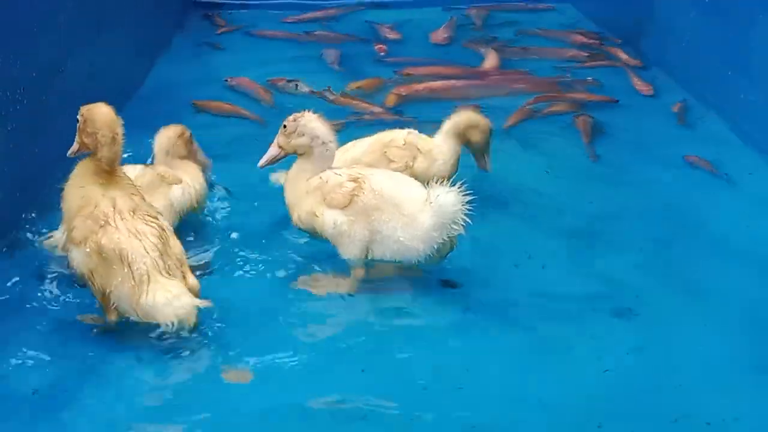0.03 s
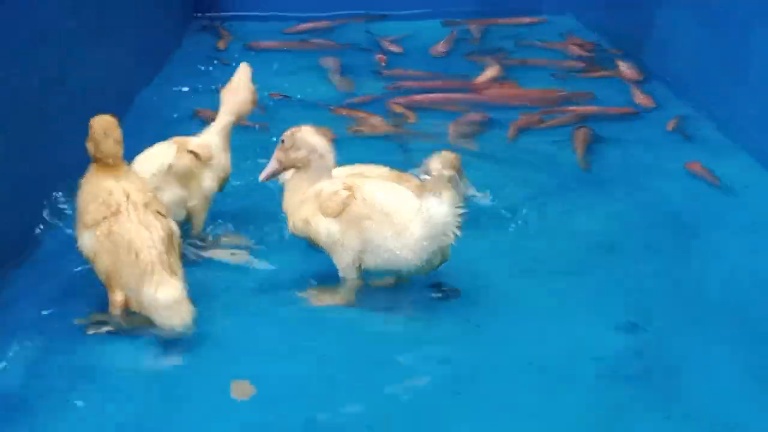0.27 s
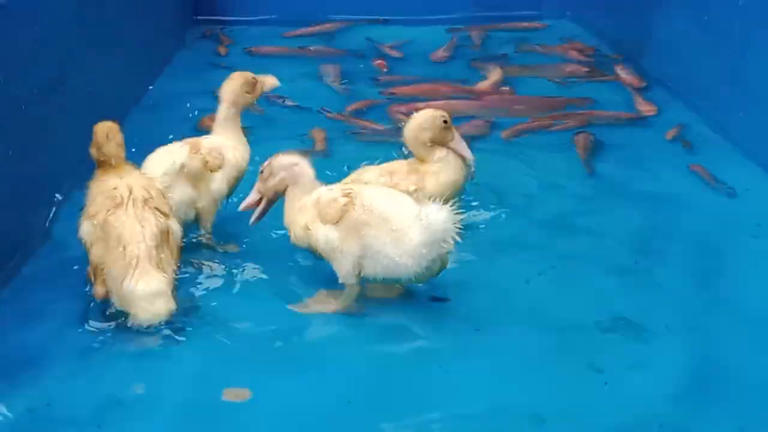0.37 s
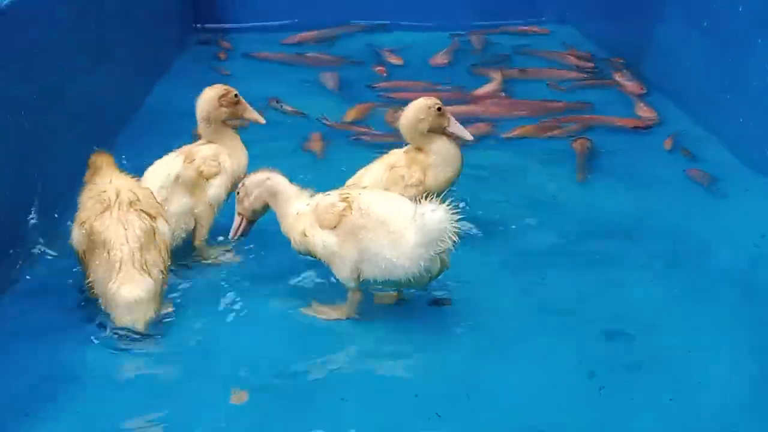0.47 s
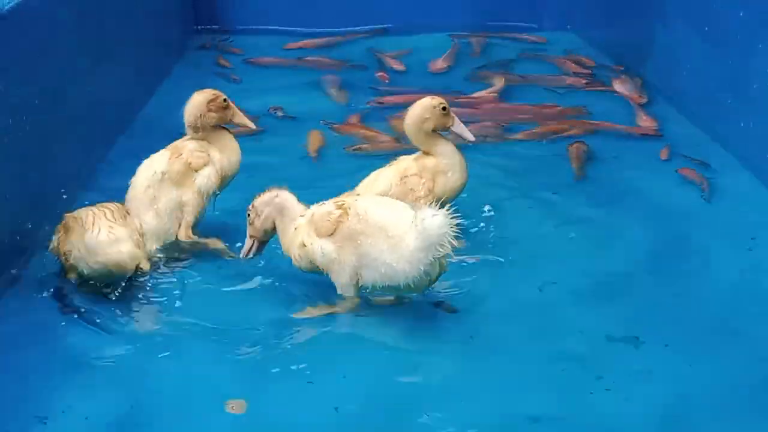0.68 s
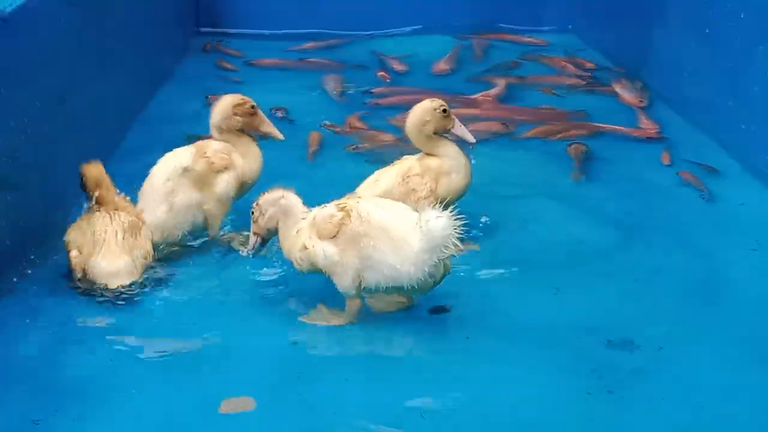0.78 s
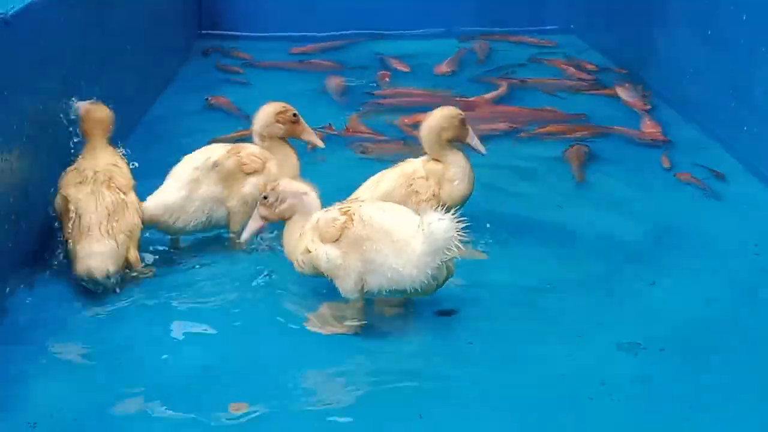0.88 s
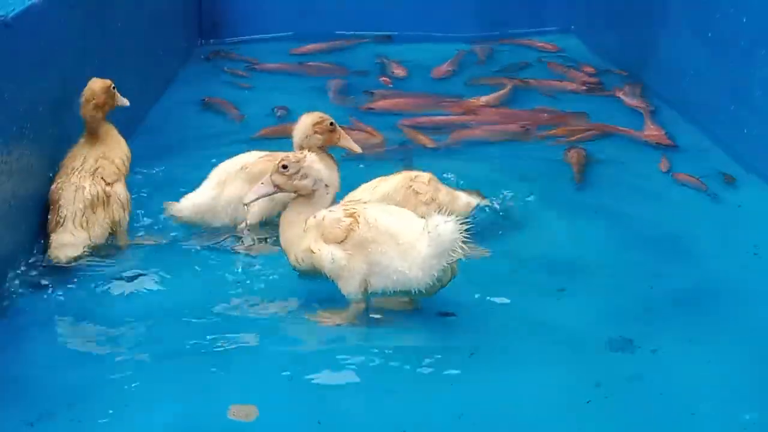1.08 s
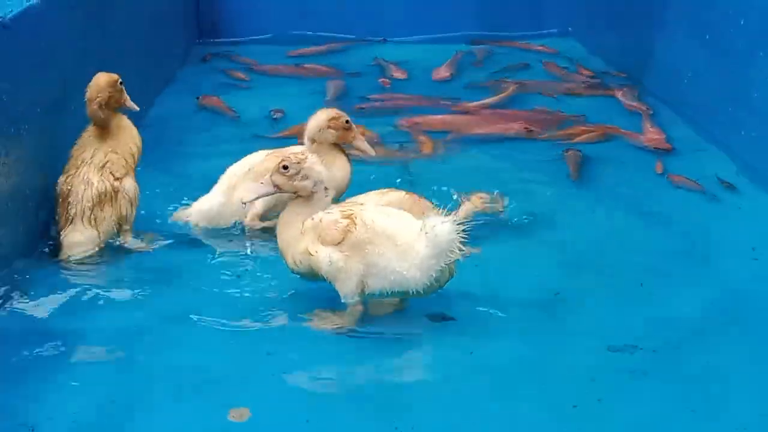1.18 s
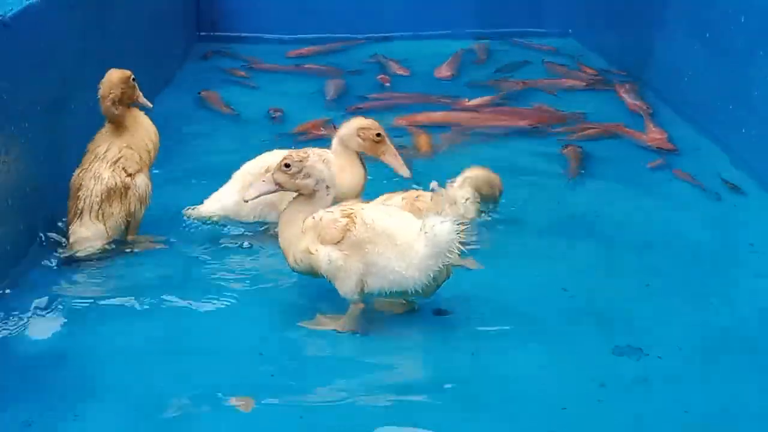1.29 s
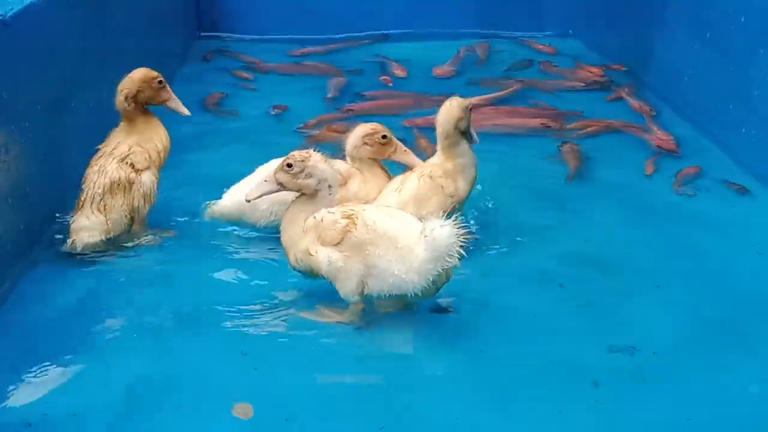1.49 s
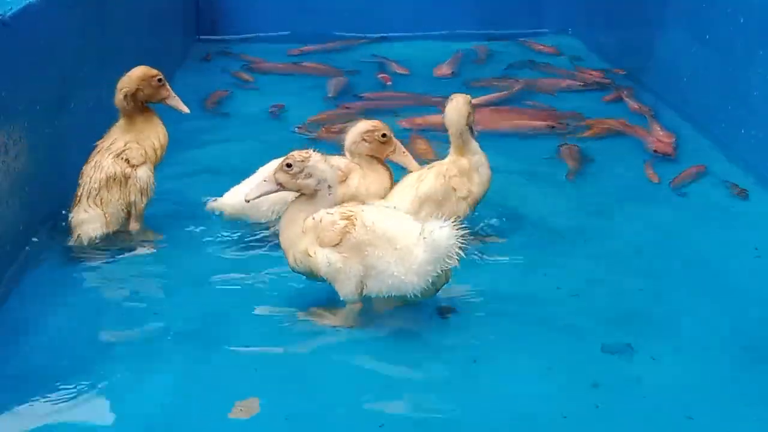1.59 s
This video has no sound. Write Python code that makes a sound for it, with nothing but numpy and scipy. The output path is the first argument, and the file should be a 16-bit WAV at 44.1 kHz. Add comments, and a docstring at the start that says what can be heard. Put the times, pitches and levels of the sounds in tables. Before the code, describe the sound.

Ducklings peep a few times, then splash and plop in shallow water.

```python
"""Ducklings in a shallow pool

Ducklings paddle outdoors and peep in near-pure arching whistles. Bills and feet throw up splashes,
swarms of tiny resonating bubbles; single drops plink, and one dive closes with a low, rising gulp.
The hard pool walls reflect it all quickly, over faint wavering tones, a low rumble and a high hiss
that dies away near the end."""
import sys
import numpy as np
from scipy import signal
from scipy.fft import rfft, irfft, next_fast_len
from scipy.io import wavfile
from scipy.ndimage import uniform_filter1d

SR = 44100
rng = np.random.default_rng(int(sys.argv[2]) if len(sys.argv) > 2 else 0)


def master_out(mix):
    """Clip the mix to full scale and print it as 16-bit PCM to the path in sys.argv[1]."""
    frames = np.transpose(np.atleast_2d(mix))
    ceiling = np.clip(frames, -1, 1)
    pcm = np.round(ceiling * 32767).astype(np.int16)
    wavfile.write(sys.argv[1], SR, pcm)


N = 72765


def ducklings():
    """Pitch glides: loud arching peeps, their distance heard as echo level, and soft falling ones."""
    # close peeps, one contour each: t/s, f/Hz, level/dB
    peeps = [
        [(.170, 1495, -50.5), (.180, 2220, -54), (.190, 2660, -57.5), (.197, 2694, -42), (.213, 2764, -32.5),
         (.226, 2433, -35.5), (.240, 2277, -31), (.254, 2235, -31), (.264, 2068, -35.5), (.272, 1714, -44)],
        [(.450, 1577, -50.5), (.459, 2185, -38.5), (.468, 2636, -34.5), (.476, 3108, -50), (.485, 3413, -37.5),
         (.500, 3178, -41), (.507, 2705, -25.5), (.520, 2535, -28.5), (.527, 2552, -20), (.545, 2296, -27),
         (.557, 1850, -41.5)],
        [(.590, 4500, -48.5), (.602, 3925, -43), (.609, 3268, -35), (.620, 3085, -33), (.632, 2800, -37),
         (.644, 2390, -48.5)],
    ]
    # echo of each close peep: level/dB
    echo_levels = [5, 1, 4.5]
    # soft peeps: t/s, length/s, first f/Hz, last f/Hz, level/dB
    soft_peeps = [(0.087, 0.062, 4700, 3470, -62.5), (0.211, 0.037, 4023, 3048, -42),
                  (0.234, .05, 3498, 2988, -37), (0.25, 0.029, 4520, 3260, -43),
                  (0.357, 0.037, 4394, 3265, -54), (0.532, .018, 4920, 3850, -54),
                  (0.673, 0.015, 4870, 2905, -48.5), (0.792, 0.025, 4890, 2550, -54),
                  (1.216, 0.016, 3825, 2650, -52), (1.405, 0.05, 4140, 3770, -69.5),
                  (1.439, 0.028, 4030, 2744, -58), (1.586, 0.043, 4185, 2930, -63),
                  (1.600, .03, 4540, 3580, -77)]
    loud, soft = np.zeros((2, N))
    for rows, wet_db in zip(peeps, echo_levels):
        loud += pool(whistle(curve(rows), swell(rows), waver=.009, octave_db=-39), wet_db)
    for start, length, first_hz, last_hz, db in soft_peeps:
        progress = np.clip((np.arange(N) / SR - start) / length, 0, 1)
        hz = first_hz + (last_hz - first_hz) * progress * (1 + progress) / 2
        gain = np.sqrt(2) * undb(db) * np.sin(np.pi * progress)
        soft += whistle(hz, gain, waver=.013, octave_db=-33)
    return loud + pool(soft, wet_db=0.5)


def whistle(hz, gain, waver, octave_db):
    """A duckling's voice: a sine and weak second harmonic, modulated in frequency and amplitude."""
    phase = wavering_phase(hz, waver, rate_hz=540)
    flutter_db = 2.2 * walk(250)
    return gain * undb(flutter_db) * (np.sin(phase) + undb(octave_db) * np.sin(2 * phase))


def gulp():
    """Cavity resonance: the pitch of an air pocket rises as it closes."""
    # air pocket resonance: t/s, f/Hz, level/dB
    pocket = [(.960, 170.9, -55.5), (.990, 164.8, -37.5), (1.015, 186.5, -32), (1.035, 241.8, -39),
              (1.050, 325.3, -30), (1.064, 416, -42), (1.080, 465, -33.5), (1.094, 612, -41),
              (1.125, 500, -77.5)]
    return swell(pocket) * np.sin(wavering_phase(curve(pocket), waver=.03, rate_hz=150))


def plinks():
    """Free oscillation: each single bubble rings at its natural frequency."""
    # bubbles: t/s, f/Hz, level/dB, T60/s, rise/(octaves/s)
    bubbles = [(.023, 2246, -35.5, 0.012, -13), (0.077, 1582, -54, 0.081, 1.5),
               (0.105, 2580, -42.5, 0.021, -14.5), (0.152, 2280, -49.5, 0.05, -11.5),
               (.158, 1523, -49, 0.3, 4.5), (0.263, 1444, -38.5, 0.049, 1), (0.282, 884, -41.5, 0.083, -2),
               (0.398, 1775, -46.5, 0.12, 1), (0.571, 1687, -40, 0.032, 2.5),
               (.642, 1910, -44.5, 0.026, 4.5), (0.747, 803, -48.5, 0.12, 12.5),
               (0.755, 1326, -40, 0.032, -13), (0.83, 1418, -38.5, 0.065, 0.5),
               (0.839, 1450, -35.5, 0.027, 10.5), (0.907, 898, -42, 0.3, -4),
               (.927, 813, -22.5, 0.03, 12.5), (0.943, 1530, -24.5, 0.01, 4), (0.969, 932, -28, 0.12, 7),
               (1.0469, 1617, -23.5, 0.075, 20.5), (1.079, 58.7, -34.5, 0.031, 5.5),
               (1.083, 501, -15, 0.012, 25), (1.181, 802, -30, 0.049, 3), (1.182, 966, -33.5, 0.098, 8),
               (1.310, 536, -44, 0.047, -8.5), (1.432, 2038, -67, 0.15, 2)]
    out = np.zeros(N)
    for start, hz, db, t60, rise in bubbles:
        add(out, start, undb(db) * bubble(hz, t60, rise, attack=.7 / hz))
    return out


def bubble(hz, t60, rise, attack):
    """A damped oscillator with gliding pitch; a positive rise is a bubble nearing the surface."""
    t = np.arange(int(t60 * SR) + 2) / SR
    pitch = np.minimum(hz * 2 ** (rise * t), SR * .45)
    envelope = undb(-60 * t / t60) * (1 - np.exp(-t / attack))
    return envelope * np.sin(2 * np.pi * np.cumsum(pitch) / SR)


def splashes():
    """Smaller bubbles resonate higher: tiny ones make the splash, the finest its fizz."""
    # bubble swarms, both tables: t/s, attack/s, decay/s, level/dB, centre f/Hz, spread/octaves
    body = [(.000, 0.0028, 0.056, -59.5, 3110, 0.41), (0.019, 0.0095, 0.012, -49.5, 2120, 0.32),
            (0.104, 0.0027, 0.012, -56.5, 3710, 0.47), (.553, 0.009, 0.022, -40, 3086, 0.31),
            (0.749, 0.012, 0.044, -51, 2980, 0.49), (0.833, 0.026, 0.087, -50.5, 2620, 0.57),
            (.871, 0.018, 0.03, -34.5, 3200, 0.55), (.915, 0.026, 0.061, -36.5, 1516, 0.858),
            (1.045, .002, 0.02, -41.5, 2630, 0.71), (1.180, 0.0052, 0.019, -49.5, 2104, 0.53),
            (1.287, 0.013, 0.037, -60.5, 1980, 0.5), (1.432, 0.0095, 0.024, -61, 2976, 0.24)]
    fizz = [(.758, .008, 0.007, -58, 12500, .2), (.872, .02, .08, -72, 11500, .3),
            (1.028, .004, 0.02, -61, 13000, .2)]
    return (swarms(body, per_s=4200, ring_cycles=19.2, top_hz=7500)
            + swarms(fizz, per_s=500, ring_cycles=90, top_hz=15000))


def swarms(rows, per_s, ring_cycles, top_hz):
    """Incoherent superposition: each swarm swells and dies, the bigger bubbles coming later."""
    fall_octaves_per_s = 0.97
    out = np.zeros(N)
    for start, attack, decay, db, centre_hz, spread in rows:
        length = attack + 4 * decay
        t = np.arange(int(length * SR)) / SR
        swarm = np.zeros(len(t))
        draws = rng.standard_normal((1200, 3))[:int(length * per_s)]
        for k, (jitter, detune, loudness) in enumerate(draws):
            onset = abs(k + jitter) / per_s
            hz = max(centre_hz * 2 ** (spread * detune - fall_octaves_per_s * onset), 600)
            t60 = ring_cycles / hz
            strength = np.exp(.75 * min(loudness, 2)) * (hz / centre_hz) ** 0.21 * (hz < top_hz)
            ring = bubble(hz, t60, rise=0.17 / t60, attack=1.5 / hz)
            add(swarm, onset, np.sign(jitter) * strength * ring)
        envelope = np.minimum(t / attack, 1) * np.exp(-(np.maximum(t - attack, 0) / decay) ** 1.5)
        add(out, start, undb(db) * unit(swarm) * envelope)
    return out


def spray():
    """Impact and resonance: fine drops hit the surface with a crack and a very short high ring."""
    # drops: t/s, f/Hz, ring level/dB, crack level/dB
    drops = [(0.522, 6400, -42, -60), (0.669, 6700, -39, -64), (0.699, 6750, -44.5, -38.5),
             (0.764, 6710, -42.5, -54), (0.993, 6910, -37, -66), (1.002, 7450, -40.5, -69.5),
             (1.017, 6370, -34.5, -54.5), (1.087, 5660, -55.5, -51), (1.343, 6630, -53, -72)]
    out = np.zeros(N)
    t = np.arange(SR // 50) / SR
    for start, hz, ring_db, crack_db in drops:
        add(out, start, undb(ring_db) * bubble(hz, t60=0.013, rise=1.6, attack=0.0017))
        add(out, start, undb(crack_db) * rng.standard_normal(len(t)) * np.exp(-t / 0.00042))
    return out


def pool(x, wet_db):
    """Reflection: hard walls add a few early echoes and a short diffuse tail to the direct sound."""
    # wall echoes: delay t/s, level/dB
    walls = [(.0046, -18.5), (.0093, -16), (0.0184, -19), (.026, -22)]
    # spectrum of the tail: f/Hz, level/dB
    tail_spectrum = [(100, -7), (500, -3.5), (1500, -2.5), (2400, -11.5), (3200, 5.5), (4800, -2.5),
                     (5700, 4.5), (15000, -11)]
    t60_s, build_up_s, tail_db = 0.17, 0.0043, -6
    t = np.arange(SR // 2) / SR
    tail = rng.standard_normal(len(t)) * undb(-60 * t / t60_s) * (1 - np.exp(-(t / build_up_s) ** 2))
    response = undb(tail_db) * colour(unit(tail) / np.sqrt(len(t)), tail_spectrum)
    for delay, db in walls:
        response[int(delay * SR)] += undb(db)
    return x + undb(wet_db) * signal.fftconvolve(x, response)[:N]


def thin_tones():
    """Random modulation: faint tones behind the peeps waver in pitch and flicker in level."""
    # one contour a tone: t/s, f/Hz, level/dB
    tones = [
        [(.22, 4750, -48), (.29, 4840, -59.5), (.34, 4780, -73.5), (.39, 4760, -62.5), (.45, 4680, -70.5),
         (.53, 4983, -52), (.59, 4756, -59), (.65, 4910, -56), (.72, 4885, -71.5), (.78, 4930, -60)],
        [(.98, 4390, -60), (1.05, 4790, -66), (1.095, 4626, -72), (1.125, 4670, -74.5), (1.17, 4930, -71.5),
         (1.205, 4635, -73.5), (1.26, 5097, -73), (1.31, 5040, -90)],
        [(1.55, 1037, -90), (1.61, 1056, -80.5), (1.65, 1154, -70.5)],
    ]
    out = np.zeros(N)
    for rows in tones:
        gain = swell(rows) * undb(2.5 * walk(80))
        out += gain * np.sin(wavering_phase(curve(rows), waver=.013, rate_hz=140))
    return out


def background():
    """Filtered noise: a flickering high hiss and a faint low rumble."""
    # spectra: f/Hz, level/dB
    hiss_spectrum = [(300, -24), (1000, -28.5), (1500, -16), (2300, -6), (3100, 0.5), (4600, -1.5),
                     (5500, -24), (6600, -22), (8500, -38.5)]
    rumble_spectrum = [(25, -15), (120, 3.5), (190, 2), (300, -6.5), (600, -29), (4000, -45.5)]
    # envelopes: t/s, level/dB
    hiss_level = [(0, -55.5), (.08, -83), (.2, -49), (.40, -62), (.62, -46.5), (.74, -59.5), (1.0, -66.5),
                  (1.13, -78), (1.34, -66), (1.39, -101), (1.65, -87.5)]
    rumble_level = [(0, -77.5), (.26, -65.5), (.38, -76), (.55, -59), (.8, -72.5), (1.1, -72), (1.42, -80)]
    hiss = unit(colour(rng.standard_normal(N), hiss_spectrum))
    flicker_db = 2 * walk(64)
    rumble = unit(colour(rng.standard_normal(N), rumble_spectrum))
    return hiss * undb(curve(hiss_level) + flicker_db) + rumble * undb(curve(rumble_level))


def undb(db):
    """Decibels to amplitude ratio."""
    return 10 ** (np.asarray(db) / 20)


def unit(x):
    """Normalisation to rms 1."""
    return x / np.sqrt(np.mean(x ** 2) + 1e-20)


def curve(rows, column=1):
    """Linear interpolation of one table column in time."""
    rows = np.array(rows, float)
    return np.interp(np.arange(N) / SR, np.sort(rows[:, 0]), rows[:, column])


def swell(rows, fade_s=.003):
    """Amplitude envelope of a sine from a (t/s, f/Hz, level/dB) contour, faded outside its ends."""
    t = np.arange(N) / SR
    outside = np.maximum(np.maximum(rows[0][0] - t, t - rows[-1][0]), 0)
    return np.sqrt(2) * undb(curve(rows, column=2)) * np.exp(-np.minimum(outside / fade_s, 10) ** 2)


def colour(x, points):
    """Minimum-phase filtering through (f/Hz, level/dB) points."""
    size = 2 * next_fast_len(len(x))
    hz, db = np.array(points, float).T
    bin_hz = np.arange(size // 2 + 1) * SR / size
    gain = undb(np.interp(np.log(bin_hz + 1), np.log(hz), db))
    cepstrum = irfft(np.log(gain))
    cepstrum[1:size // 2] *= 2  # folding makes the filter causal
    cepstrum[size // 2 + 1:] = 0
    return irfft(rfft(x, size) * np.exp(rfft(cepstrum)))[:len(x)]


def walk(rate_hz):
    """Low-pass noise: a smooth random fluctuation of rms 1."""
    width = max(int(SR / rate_hz), 1)
    return unit(uniform_filter1d(uniform_filter1d(rng.standard_normal(N), width), width))


def wavering_phase(hz, waver, rate_hz):
    """Phase as the integral of a frequency that strays by the rms fraction waver."""
    return 2 * np.pi * np.cumsum(hz * (1 + waver * walk(rate_hz))) / SR


def add(out, start, x):
    """Superposition of a short sound at a start time in seconds."""
    i = min(max(int(start * SR), 0), len(out))
    out[i:i + len(x)] += x[:len(out) - i]


def scene():
    """Superposition of voices and water, reflected in the pool, over the background."""
    water = gulp() + plinks() + spray() + splashes()
    return (ducklings() + pool(thin_tones(), wet_db=1) + pool(water, wet_db=-0.5) + background())[None]


def record(dry):
    """Frequency response: the microphone is dull above 5 kHz, and a low-pass cuts the top."""
    # microphone response: f/Hz, level/dB
    microphone = [(30, -14), (4900, 0), (5600, -9), (6800, -0.5), (8500, -19), (10000, -14.5), (13000, -11),
                  (16000, -31)]
    low_pass = signal.ellip(8, .2, 70, 15500, fs=SR, output="sos")
    return signal.sosfilt(low_pass, colour(dry[0], microphone))[None]


dry = scene()
out = record(dry)
master_out(out)
```